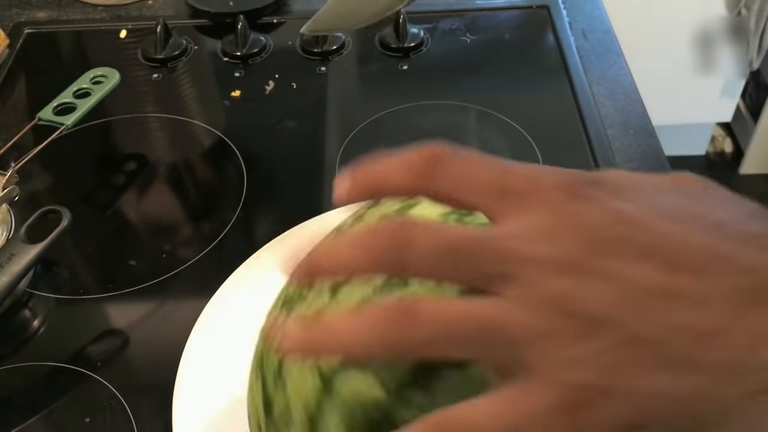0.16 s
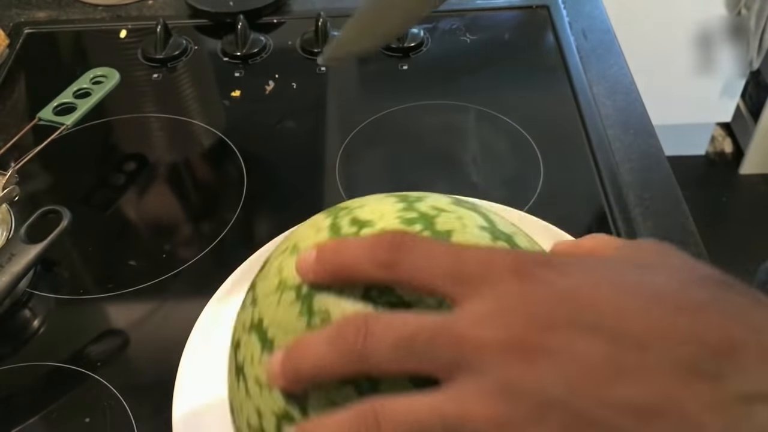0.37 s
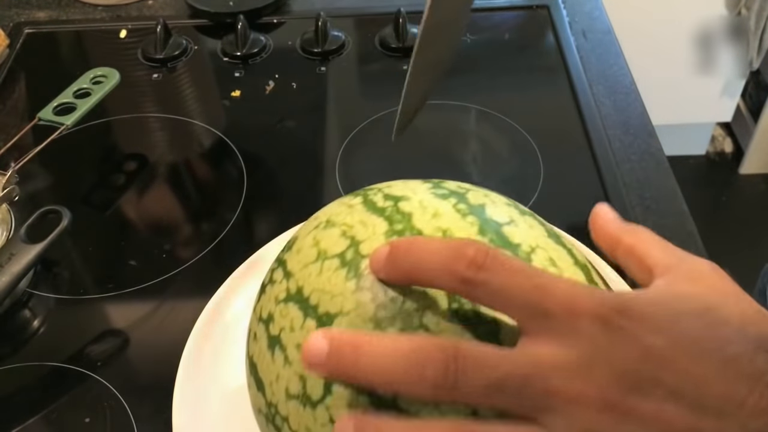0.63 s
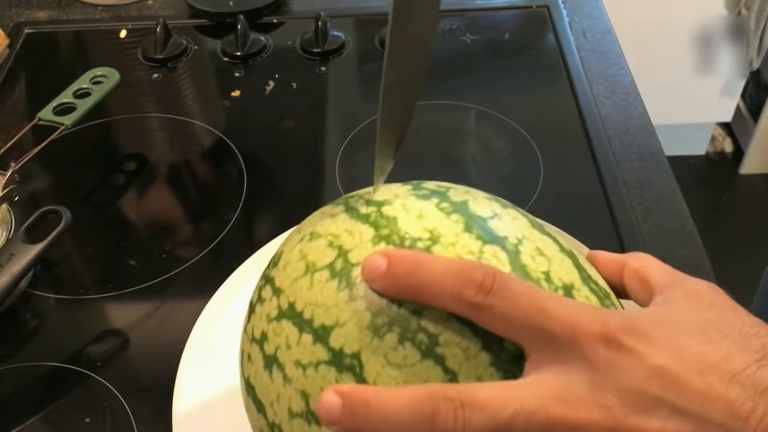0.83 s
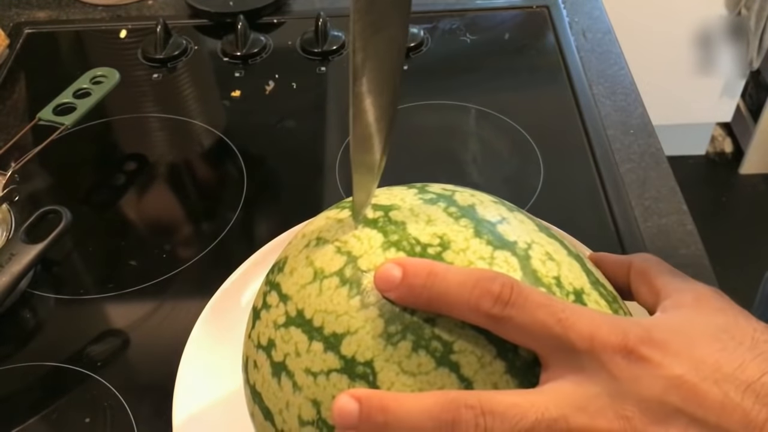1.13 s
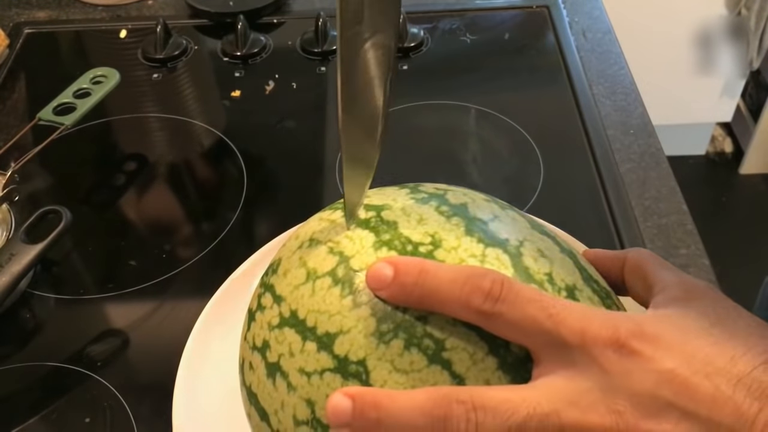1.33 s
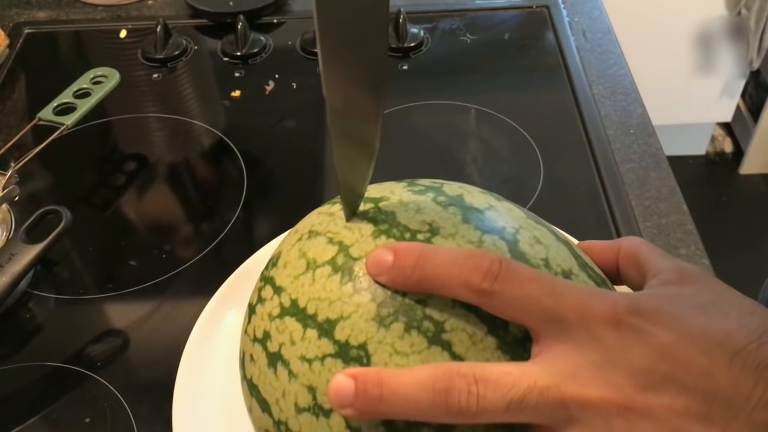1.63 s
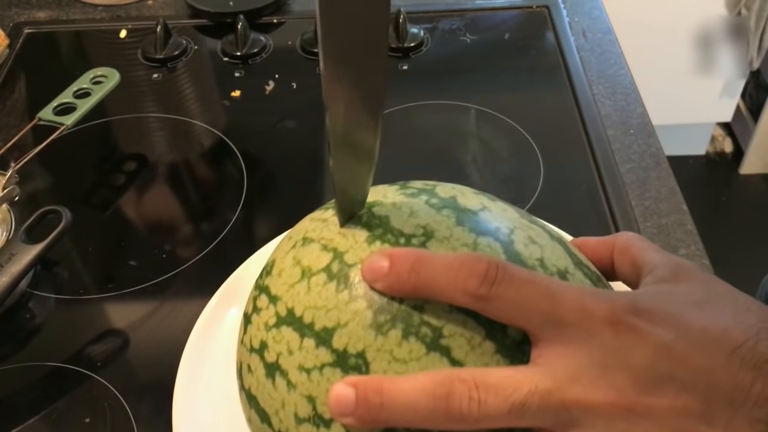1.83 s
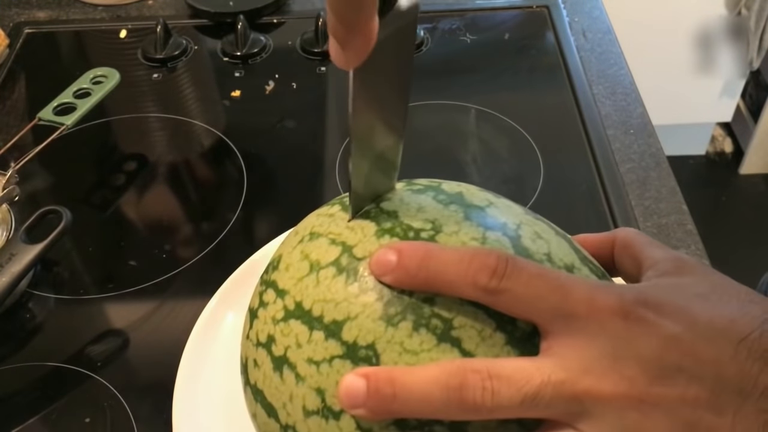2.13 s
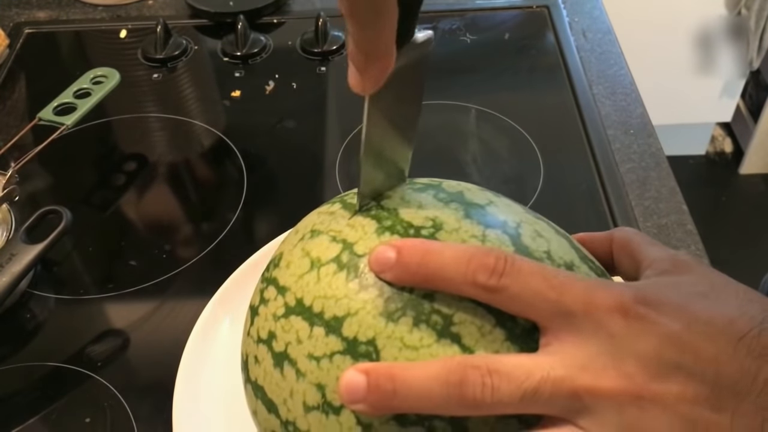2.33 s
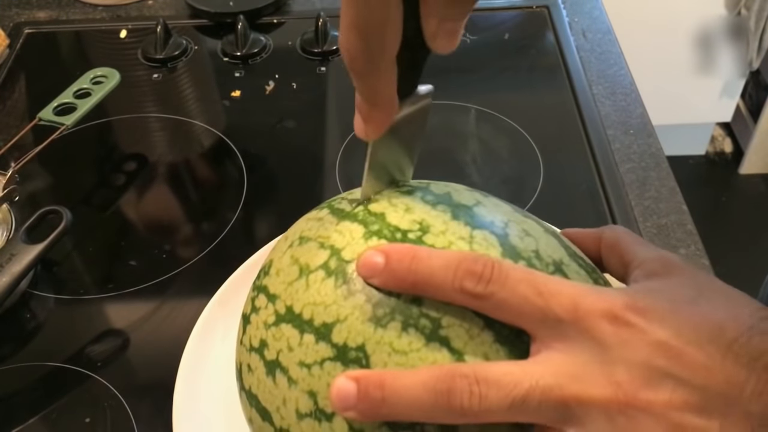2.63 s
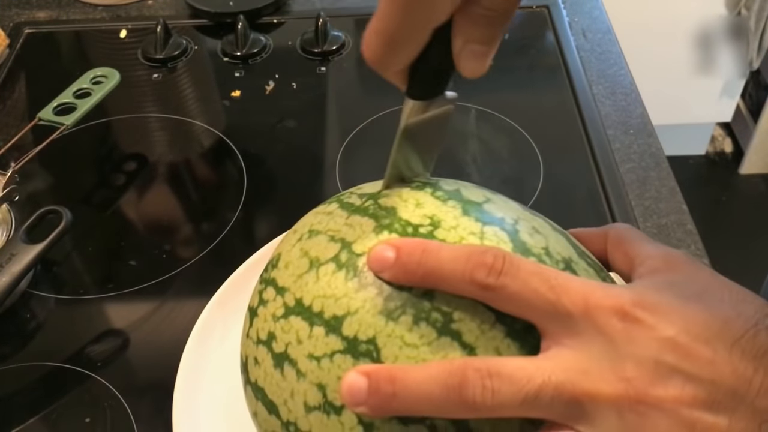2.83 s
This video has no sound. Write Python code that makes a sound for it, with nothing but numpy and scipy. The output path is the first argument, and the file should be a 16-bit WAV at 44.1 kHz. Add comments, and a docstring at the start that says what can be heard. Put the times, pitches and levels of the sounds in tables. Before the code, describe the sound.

Watermelon being cut: crisp crunching knife pushes, hollow thumps and plate clacks in a small kitchen

```python
"""Cutting a watermelon in a small kitchen

A melon on a plate rocks on a glass hob, close by: struck modes and noise puffs make the dull knocks.
A large knife ticks into the rind, then crunches through in five strokes that rock the plate again.
The crunch is dense random pops and hiss, with ringing steel and rasping flesh; a hand brushes the skin.
Decaying noise makes the kitchen's answer, under a wavering low drone that grows and a steady rush of air."""
import sys
import numpy as np
from scipy import signal
from scipy.fft import rfft, irfft, next_fast_len
from scipy.io import wavfile
from scipy.ndimage import map_coordinates

SR = 44100
rng = np.random.default_rng(int(sys.argv[2]) if len(sys.argv) > 2 else 0)


def master_out(mix):
    """Clip the mix to full scale and print it as 16-bit PCM to the path in sys.argv[1]."""
    frames = np.transpose(np.atleast_2d(mix))
    ceiling = np.clip(frames, -1, 1)
    pcm = np.round(ceiling * 32767).astype(np.int16)
    wavfile.write(sys.argv[1], SR, pcm)


N = 131859  # samples


def amp(db):
    """Decibels to gain."""
    return 10 ** (np.asarray(db) / 20)


def unit(x):
    """Scaled to rms 1."""
    return x / np.sqrt(np.mean(x ** 2) + 1e-20)


def along(points, hz):
    """Values at hz, read between (Hz, value) points on a log frequency axis."""
    f, v = np.transpose(points)
    return np.interp(np.log(hz + 1), np.log(f + 1), v)


def clock():
    """Time of every sample in seconds."""
    return np.arange(N) / SR


def coloured(x, spectrum):
    """x filtered by a (Hz, dB) spectrum, at rms 1."""
    gain = amp(along(spectrum, np.fft.rfftfreq(len(x), 1 / SR)))
    return unit(irfft(rfft(x) * gain, len(x)))


def noise(spectrum, size=N):
    """Coloured noise of rms 1."""
    white = rng.standard_normal(next_fast_len(size))
    return unit(coloured(white, spectrum)[:size])


def decay(t60, rise):
    """Half a second of a struck envelope: a rounded onset, then an exponential fall (both in s)."""
    t = np.arange(SR // 2) / SR
    return np.exp(-np.log(1000) * t / t60) * (1 - np.exp(-t / rise))


def burst(spectrum, t60, rise):
    """A dying puff of coloured noise."""
    return noise(spectrum, size=SR // 2) * decay(t60, rise)


def ring(modes, rise, scatter_db=2, detune=0.018):
    """Damped sine modes, each a little different in level, pitch and phase at every blow."""
    t = np.arange(SR // 2) / SR
    out = np.zeros(SR // 2)
    for (hz, db, t60), (a, b, c) in zip(modes, rng.standard_normal((len(modes), 3))):
        wave = np.sin(2 * np.pi * (hz * (1 + detune * b) * t + c))
        out += amp(db + scatter_db * a) * decay(t60, rise) * wave
    return out


def add(track, s, sound):
    """Mix a sound in at time s."""
    part = track[round(s * SR):][:len(sound)]
    part += sound[:len(part)]


def wobble(rate):
    """A smooth random curve, rate knots a second."""
    return map_coordinates(rng.standard_normal(SR // 10), [clock() * rate], mode="mirror")


# decay of the small kitchen: pitch_hz [Hz], t60_s [s]
ROOM = [(100, 0.45), (500, 0.24), (2000, 0.23), (6000, 0.22), (15000, 0.12)]
ROOM_DELAY_S = 0.008


def in_kitchen(x, room_db):
    """A sound plus its short room tail: decaying noise that lasts longest in the bass."""
    hz, t, z = signal.stft(rng.standard_normal(SR // 2), SR, nperseg=256)
    fall = np.exp(-np.log(1000) * t / along(ROOM, hz)[:, None])
    tail = signal.istft(z * fall, SR, nperseg=256)[1]
    late = np.pad(x, (round(ROOM_DELAY_S * SR), 0))
    wet = signal.fftconvolve(late, tail / np.linalg.norm(tail))
    return x + amp(room_db) * wet[:len(x)]


# colour of the rush of air: pitch_hz [Hz], level_db [dB]
AIR = [(22, -43), (40, 0), (80, 0.5), (120, -3), (180, -12.5), (450, -20.5), (1100, -18), (2200, -27),
       (3100, -34.5), (6500, -38.5), (9500, -39.5), (10400, -45.5), (11600, -39.5), (15800, -46.5)]
AIR_DB = -39
# course of the low drone: start_s [s], level_db [dB, before the waver]
DRONE_LEVEL = [(0, -36), (1.6, -33), (2.3, -27.5), (2.99, -26)]
DRONE_HZ = 53.7
# waver scales a random curve in pitch and in level; its rate is in knots a second
DRONE_WAVER_HZ, DRONE_WAVER_DB, DRONE_WAVER_RATE = 4.274, 0.5, 15


def background():
    """A sine drone wavering in pitch and level, and a steady rush of air made of coloured noise."""
    hz = DRONE_HZ + DRONE_WAVER_HZ * wobble(DRONE_WAVER_RATE)
    course_db = np.interp(clock(), *np.transpose(DRONE_LEVEL))
    db = course_db + DRONE_WAVER_DB * wobble(DRONE_WAVER_RATE)
    drone = unit(np.sin(2 * np.pi * np.cumsum(hz) / SR))
    return amp(AIR_DB) * noise(AIR) + amp(db) * drone


CELLS_PER_S, CELL_SPREAD_DB = 1300, 2
CELL_SHARE = 0.53  # share of pops in the power, the rest is hiss
RIND_RING_S, RIND_RING_DB = 0.017, -3  # every pop rings on briefly (t60)


def cells(spectrum):
    """Dense tiny pops over a sliding hiss, each ringing on as a short tail of noise."""
    size = next_fast_len(N)
    struck = rng.random(size) < CELLS_PER_S / SR
    signs = np.sign(rng.standard_normal(size))
    pops = struck * signs * amp(CELL_SPREAD_DB * rng.standard_normal(size))
    hiss = rng.standard_normal(size)
    tear = np.sqrt(CELL_SHARE) * unit(pops) + np.sqrt(1 - CELL_SHARE) * hiss
    tail = rng.standard_normal(SR // 2) * decay(RIND_RING_S, 1 / SR)
    ringing = signal.fftconvolve(tear, tail)[:size]
    return coloured(tear + amp(RIND_RING_DB) * unit(ringing), spectrum)[:N]


# the hand brushes over the melon: centre_s [s], length_s [s], rub_db [dB], hiss_db [dB]
BRUSHES = [(0.13, 0.092, -65, -53), (0.404, 0.39, -41, -63), (0.83, 0.26, -46, -57.5),
           (1.634, 0.059, -83, -54), (2.795, 0.059, -43, -47)]
# colour of the rub: pitch_hz [Hz], level_db [dB]
BRUSH = [(150, 21), (400, -55), (560, 11), (800, 4.5), (2200, 5.5), (4000, -5.5), (7000, -12), (15000, -31)]
# colour of the skin's hiss: pitch_hz [Hz], level_db [dB]
SKIN = [(1500, 2), (5000, -0.5), (16000, 0)]
# the rind squeaks once as the melon is turned
SQUEAK_S, SQUEAK_HZ, SQUEAK_DB, SQUEAK_T60 = 0.092, 560, -32, 0.18


def hand():
    """Soft swells of skin sliding on the rind, as noise and tiny pops, and one small squeak."""
    rub, hiss = noise(BRUSH), cells(SKIN)
    out = np.zeros(N)
    for centre, length, rub_db, hiss_db in BRUSHES:
        swell = np.exp(-(2 * (clock() - centre) / length) ** 2)
        out += (amp(rub_db) * rub + amp(hiss_db) * hiss) * swell
    add(out, SQUEAK_S, ring([(SQUEAK_HZ, SQUEAK_DB, SQUEAK_T60)], rise=0.012))
    return out


# knocks of melon and plate on the hob: start_s [s], then levels [dB, before the trims below]:
# thump_db, hollow_db, clunk_db, clack_db, crack_db (sharp), click_db (bright)
KNOCKS = [(0.3872, -16.5, -20.5, -18.5, -17, -26.5, -30), (0.418, -24, -32, -31, -26, -35, -39),
          (0.777, -25, -33, -30.5, -35.5, -36, -40), (0.92, -42, -34, -34.5, -51, -37, -58),
          (.954, -45, -41, -56, -41, -54, -58), (0.9961, -18.5, -30.5, -22.5, -19.5, -29, -46.5),
          (1.051, -34.5, -33, -46, -42, -41.5, -44.5), (1.746, -24, -28, -30, -52, -41, -60),
          (1.9708, -21, -20, -21, -20.5, -32.5, -51), (2.08, -22.5, -25.5, -28, -32.5, -35.5, -55),
          (2.323, -21, -30, -29, -26.5, -40, -58), (2.373, -28.5, -36, -38, -52, -60, -65),
          (2.457, -23, -20.5, -27, -41, -33.5, -39), (2.5933, -21.5, -23.5, -23.5, -20.5, -33.5, -46),
          (2.786, -28.5, -34, -34, -48, -37, -46)]
THUMP_DB, HOLLOW_DB, CLUNK_DB = 4.5, 1, 1.5
PLATE_DB, CLACK_DB, CRACK_DB, CLICK_DB = -5.5, 1, 7, 8
# melon, plate and hob ring together: pitch_hz [Hz], level_db [dB], t60_s [s]
BODY_MODES = [(65, -5, 0.43), (93.8, -5.5, 0.56), (113.1, -1.5, 0.27), (145.7, -2.5, 0.14),
              (213.6, -15, 0.29), (369.8, -13, 0.13), (475, -24, 0.078)]
# the melon's hollow note: pitch_hz [Hz], level_db [dB], t60_s [s]
HOLLOW_MODES = [(177.7, -5.5, 0.15), (218.7, -1, 0.18), (270, -13, 0.17), (322, -19.5, 0.15)]
# the plate's ring: pitch_hz [Hz], level_db [dB]
PLATE_MODES = [(554, -4), (635, -4), (672, -3), (800, -11), (1238, -6), (1353, 0), (1425, -2), (1545, -1),
               (1605, 0), (1730, -5), (1960, -8), (2150, -9), (2325, -10)]
# first hard swing of the plate: pitch_hz [Hz], level_db [dB], t60_s [s]
CLACK_MODES = [(644, -8.5, 0.019), (1443, 3.5, 0.012), (1635, 7.5, 0.0073), (2205, 0, 0.018)]
# colour of the dull contact noise: pitch_hz [Hz], level_db [dB]
CLUNK = [(60, -25), (170, -4.5), (260, 4), (400, -3), (660, -1.5), (900, -10), (1500, -33), (4000, -55)]
# colour of the sharp crack: pitch_hz [Hz], level_db [dB]
CRACK = [(800, -13), (1900, 9.5), (2300, 12.5), (2850, -3.5), (3450, 6), (4000, -15), (5000, -14),
         (6500, -21), (9000, -75)]
# hard edge of the contact: pitch_hz [Hz], level_db [dB]
CLICK = [(1200, -9), (2900, 3), (4800, -13), (9000, -37)]
THUMP_RISE_S = 0.0034
PLATE_T60, CLUNK_T60, CRACK_T60, CLICK_T60 = 0.078, 0.12, 0.037, 0.031  # s
# contact time at the hard clack level; weaker knocks are slower, ten times per SOFTER_DB
CONTACT_S, HARD_CLACK_DB, SOFTER_DB = 0.0004, -9, 46
REBOUND_S, REBOUND_DB = 0.024, -14  # the plate chatters once after each knock
KNOCK_ROOM_DB = -7


def knocks():
    """The heavy melon thumps hollowly on the hob while the plate clacks, chatters and rings briefly."""
    out = np.zeros(N)
    plate = [(hz, db, PLATE_T60) for hz, db in PLATE_MODES]
    for s, thump_db, hollow_db, clunk_db, clack_db, crack_db, click_db in KNOCKS:
        weaker_db = HARD_CLACK_DB - max(clack_db, crack_db)
        rise = CONTACT_S * 10 ** (weaker_db / SOFTER_DB)
        blow = amp(thump_db + THUMP_DB) * ring(BODY_MODES, THUMP_RISE_S)
        blow += amp(hollow_db + HOLLOW_DB) * ring(HOLLOW_MODES, THUMP_RISE_S)
        blow += amp(clunk_db + CLUNK_DB) * burst(CLUNK, CLUNK_T60, rise=0.001)
        blow += amp(clack_db + PLATE_DB) * ring(plate, rise, detune=0.0022)
        blow += amp(click_db + CLICK_DB) * burst(CLICK, CLICK_T60, rise)
        for delay, db in ((0, 0), (REBOUND_S, REBOUND_DB)):
            clack = amp(db + clack_db + CLACK_DB) * ring(CLACK_MODES, rise)
            crack = amp(db + crack_db + CRACK_DB) * burst(CRACK, CRACK_T60, rise)
            add(blow, delay, clack + crack)
        add(out, s, in_kitchen(blow, KNOCK_ROOM_DB))
    return out


# the blade's tip ticks in the rind: start_s [s], level_db [dB]
TICKS = [(1.0178, -36.5), (1.263, -47.5), (1.278, -52), (1.462, -45.5), (1.732, -45), (1.761, -45),
         (1.947, -45)]
# colour of a tick: pitch_hz [Hz], level_db [dB]
TICK = [(2000, -30), (5000, -3.5), (9000, -6), (10500, -7), (12000, 2.5), (16000, -15)]
TICK_T60, TICK_RISE_S = 0.066, 0.0015
# ring of the steel, in ticks and in singing(): pitch_hz [Hz], level_db [dB], t60_s [s, ticks only]
BLADE_MODES = [(5300, 0, 0.2), (6805, 2, 0.13), (8600, -4, 0.24), (9570, -5, 0.12), (10000, -4, 0.088),
               (11600, -12, .14), (13200, -11, .18), (14580, -2, .1)]
BLADE_DB = -15  # trim of the steel under the tick's noise
# fibres of the rind snap: start_s [s], level_db [dB]
SNAPS = [(2.326, -23), (2.3395, -19.5), (2.4412, -35), (2.559, -22.5), (2.649, -31), (2.678, -31),
         (2.739, -31), (2.744, -35), (2.761, -35)]
# colour of a snap: pitch_hz [Hz], level_db [dB]
SNAP = [(800, -25), (4200, -7.5), (5600, -2.5), (7200, 1.5), (9000, -14), (16000, -16)]
SNAP_T60 = 0.012


def clicks():
    """Thin steel ticks of the blade, noise with ringing modes, and dry noise snaps of the rind."""
    out = np.zeros(N)
    for s, db in TICKS:
        tip = burst(TICK, TICK_T60, TICK_RISE_S)
        steel = ring(BLADE_MODES, TICK_RISE_S, detune=0.0012)
        add(out, s, amp(db) * (tip + amp(BLADE_DB) * steel))
    for s, db in SNAPS:
        add(out, s, amp(db) * burst(SNAP, SNAP_T60, rise=0.000068))
    return out


SING_WIDTH_HZ = 90


def singing():
    """The scraped blade rings in narrow bands: noise through resonances at its modes."""
    size = next_fast_len(N)
    f = np.fft.rfftfreq(size, 1 / SR)
    response = np.zeros(len(f))
    for hz, db, _ in BLADE_MODES:
        response += amp(db) / (1 + ((f - hz) / (SING_WIDTH_HZ / 2)) ** 2)
    return unit(irfft(rfft(rng.standard_normal(size)) * response, size)[:N])


# colour of the parting fibres: pitch_hz [Hz], level_db [dB]
FIBRE = [(700, -2), (2200, 6), (7000, 0.5), (15000, 0.5)]
FIBRES_PER_S, FIBRE_SPREAD_DB, FIBRE_T60 = 190, 1.5, 0.0021  # coarser than the cells


def fibres():
    """Sparse, uneven crackles of parting fibres, each a very short decay of noise."""
    size = next_fast_len(N)
    struck = rng.random(size) < FIBRES_PER_S / SR
    breaks = struck * amp(FIBRE_SPREAD_DB * np.clip(rng.standard_normal(size), -2, 2))
    life = signal.fftconvolve(breaks, decay(FIBRE_T60, 1 / SR))[:size]
    return coloured(life * rng.standard_normal(size), FIBRE)[:N]


# pushes of the knife: start_s [s, full bite], end_s [s], then levels before the trims below:
# first_db and last_db [dB, crunch at start and end], fizz_db [dB, against the crunch],
# rasp_db [dB, low rasp], bite and release [dB/s, slopes before the start and after the end]
STROKES = [(1.751, 1.88, -46.5, -37, 3.5, -29, 580, 800), (1.985, 2.147, -29, -37.5, -2, -33.5, 700, 281),
           (2.28, 2.343, -33.5, -32.5, -5, -34, 579.5, 620),
           (2.552, 2.686, -30.5, -35.5, -7.5, -36, 847, 458),
           (2.843, 2.892, -31.5, -35, -5.5, -37, 518, 483)]
# colour of the crunching rind: pitch_hz [Hz], level_db [dB]
CRUNCH = [(800, -18), (1800, -1), (3300, 4), (5400, 4), (6100, 5), (6900, 5.5), (7800, -10.5),
          (10500, -6.5)]
# colour of the fizz over it: pitch_hz [Hz], level_db [dB]
FIZZ = [(5000, -9), (8000, 0.5), (9200, 2.5), (10400, -7.5), (11600, 0), (14700, -2), (16000, -1)]
# colour of the flesh: pitch_hz [Hz], level_db [dB]
FLESH = [(80, 13.5), (200, 1), (450, 2.5), (700, 2), (1280, 3), (1800, -3), (3200, -9), (8000, -54)]
CRUNCH_DB, FIBRE_DB, FIZZ_DB, FLESH_DB = -2.5, -9, -0.4, -3
SWELL_DB = 2  # at mid-stroke
FLESH_GROWS = 0.89  # the rasp follows the stroke's shape by this much, in dB per dB
# level of the singing at the first stroke; the fruit damps the blade more as it sinks in
SING_DB, SING_DAMPING_DB_PER_S = -8, 14


def cutting(judder_db=0.2, judder_rate=140):
    """Each push bites, swells and lets go: the rind crunches, the blade sings, the flesh rasps."""
    t = clock()
    push, top, rasp = np.zeros((3, N))
    for start, end, first_db, last_db, fizz_db, rasp_db, bite, release in STROKES:
        u = np.clip((t - start) / (end - start), 0, 1)  # progress of the stroke
        slopes_db = bite * np.maximum(start - t, 0) + release * np.maximum(t - end, 0)
        shape_db = SWELL_DB * np.sin(np.pi * u) - slopes_db
        level = amp(shape_db + first_db + (last_db - first_db) * u)
        push += level
        top += level * amp(fizz_db)
        rasp += amp(rasp_db + FLESH_GROWS * shape_db)
    sing_db = SING_DB - SING_DAMPING_DB_PER_S * (t - STROKES[0][0])
    crunch = push * (amp(CRUNCH_DB) * cells(CRUNCH) + amp(FIBRE_DB) * fibres())
    treble = top * (amp(FIZZ_DB) * cells(FIZZ) + amp(sing_db) * singing())
    flesh = amp(FLESH_DB) * rasp * cells(FLESH)
    return (crunch + treble + flesh) * amp(judder_db * wobble(judder_rate))


KNIFE_ROOM_DB = -11.5


def scene():
    """Plate, knife and hand, close by in the kitchen; only knocks and knife get its room tail."""
    plate = knocks()
    knife = in_kitchen(cutting() + clicks(), KNIFE_ROOM_DB)
    return (plate + knife + hand() + background())[None]


TOP_HZ = 15800


def record(dry):
    """The mono recorder keeps nothing above its band limit."""
    size = next_fast_len(N + SR // 2)
    kept = np.fft.rfftfreq(size, 1 / SR) < TOP_HZ
    return irfft(rfft(dry, size) * kept, size)[:, :N]


dry = scene()
out = record(dry)
master_out(out)
```